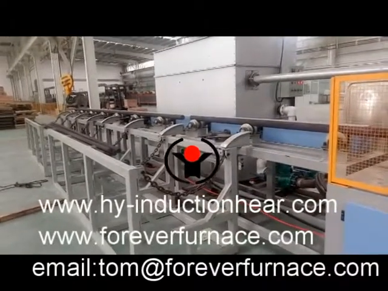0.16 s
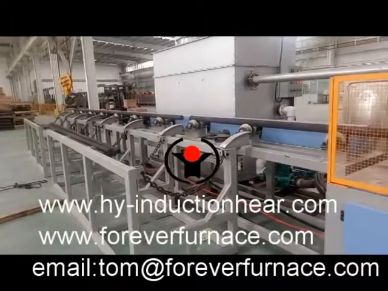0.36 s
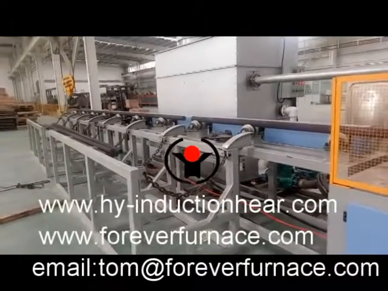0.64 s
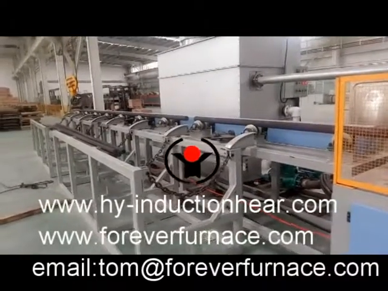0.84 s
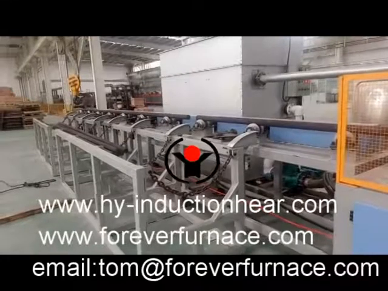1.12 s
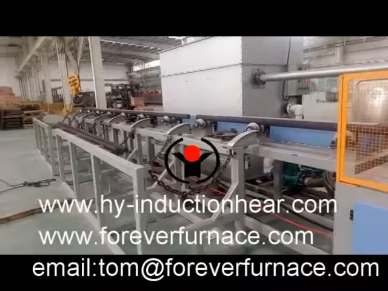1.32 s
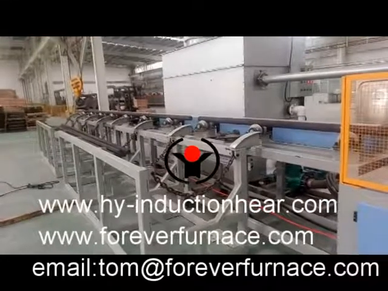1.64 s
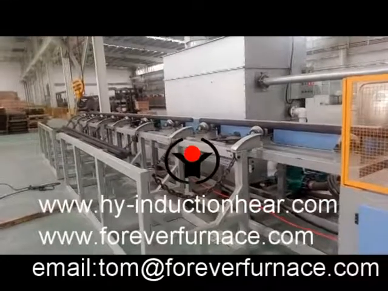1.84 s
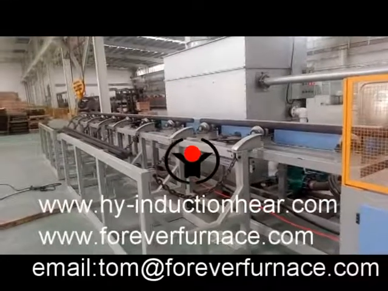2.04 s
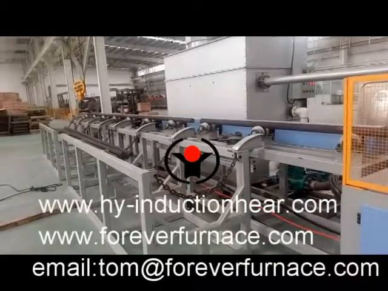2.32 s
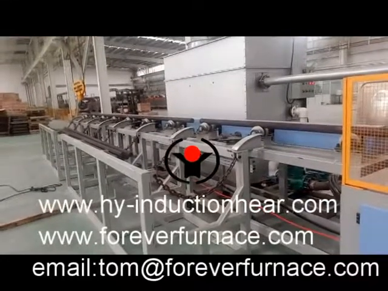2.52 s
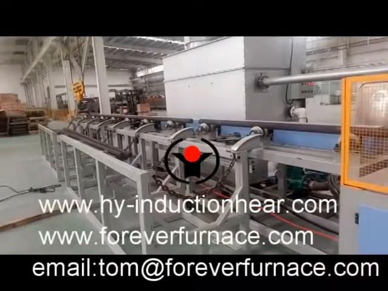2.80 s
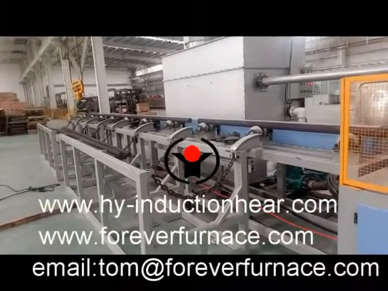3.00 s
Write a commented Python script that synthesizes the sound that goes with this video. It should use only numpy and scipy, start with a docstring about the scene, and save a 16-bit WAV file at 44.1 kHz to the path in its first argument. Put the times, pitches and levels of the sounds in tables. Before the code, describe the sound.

Heating and conveying machinery roars steadily through a large factory hall for about 3 seconds, with wavering pump and motor hums throughout. A high electrical whine is loudest at the start and gradually recedes. Low throbs in the rumble crowd together until about 1.2 seconds, then come singly near 1.6, 2.2, 2.6 and 3.1 seconds. The sound is much duller on the right side.

```python
"""An induction heating line runs in a large factory hall, heard on a phone whose right side is much duller.
From the start, furnace and conveyor roar, a pump hums at its vane rate, a motor hums and the inverter
whines at its loudest. Throbs of the low rumble crowd together up to about 1.2 s, then come singly as the
whine recedes. Throughout, the hall's many reflections interfere and make every tone waver."""
import sys
import numpy as np
from scipy import signal
from scipy.fft import rfft, irfft
from scipy.io import wavfile
from scipy.ndimage import uniform_filter1d, minimum_filter1d

SR = 44100
rng = np.random.default_rng(int(sys.argv[2]) if len(sys.argv) > 2 else 0)


def dump_mix(stems):
    """Bounce the given channels to the path in sys.argv[1] as a 16-bit WAV at rate SR."""
    frames = np.atleast_2d(stems).T  # one column per channel
    limited = np.clip(frames, -1, 1)  # hard clip at full scale
    pcm = np.round(limited * 32767).astype(np.int16)
    wavfile.write(sys.argv[1], SR, pcm)


N = 139356

# Shading of the right side. Each row: frequency in Hz, level below the left in dB.
RIGHT_SHADE = [(50, -0.5), (110, 2.5), (280, 5.5), (500, 7), (850, 12.5), (1200, 13.5), (2000, 18),
               (2500, 19), (3200, 28.5), (4100, 31), (6500, 30.5), (8000, 14)]
# Slow swell of the drone and, at half depth, the rumble. Each row: time in seconds, level in dB.
BASS_SWELL = [(0.0, 1.0), (0.16, -2.5), (0.48, 2.5), (0.72, -0.5), (0.84, 1.5), (0.92, -0.5), (1.16, 3.0),
              (1.36, -1.5), (1.48, -1.5), (1.6, 1.5), (1.72, -3.0), (1.84, 0.0), (2.0, -2.5), (2.2, 1.0),
              (2.56, -2.0), (2.64, 0.5), (2.84, -1.0), (3.12, 3.5)]


def roar(rumble_gain):
    """Furnace and conveyor fill the hall with a diffuse field, coherent between the sides at low pitch."""
    # Spectral shape of the roar. Each row: frequency in Hz, relative spectral density in dB.
    spectrum = [(20, -15), (36, -25.5), (48, -9), (72, -8.8), (97, -2), (125, -3), (170, -4.5), (200, -5.5),
                (245, -3), (340, -7), (480, -10.5), (780, -9), (1100, -14.5), (1500, -13), (2300, -14),
                (3400, -18), (4100, -24), (4900, -31), (6100, -33), (6600, -44), (7200, -55), (7700, -74.5),
                (9600, -74.5), (11000, -87), (13500, -92)]
    # Likeness of the two sides. Each row: frequency in Hz, correlation from 0 to 1.
    likeness = [(100, 1), (230, 0.87), (420, 0.78), (560, 0.8), (850, 0.8), (1200, 0.1), (2500, 0),
                (4000, 0.13)]
    # Slow swells of three bands. Each row: time in seconds, relative level in dB.
    sub_swell = [(0.0, 1), (0.28, -4.5), (0.96, 3), (1.76, -1.5), (1.96, -0.5), (2.16, -5), (2.28, 2.5),
                 (3.12, 3.5)]
    body_swell = [(0.0, -0.3), (0.24, -1.0), (0.48, 0.3), (0.58, -0.5), (0.68, 1.5), (0.84, -0.5),
                  (1.0, 0.7), (1.2, -0.5), (1.32, 1.2), (1.44, 1.3), (1.53, -1.0), (1.76, 0.5), (2.12, 0.3),
                  (2.23, -1.0), (2.32, 0.0), (2.8, 0.0), (2.9, 1.2), (3.0, -0.8), (3.12, -0.5)]
    hiss_swell = [(0.0, 0.0), (0.24, -1.3), (0.32, -1.0), (0.48, 1.0), (0.55, -1.5), (0.76, 1.0),
                  (0.83, -0.5), (0.92, 1.2), (1.12, 0.7), (1.19, -0.7), (1.25, 1.2), (1.36, 1.3),
                  (1.56, -0.8), (1.74, -0.6), (1.94, 1.0), (2.04, -0.6), (2.4, 0.0), (2.6, 0.7),
                  (2.86, -0.6), (2.93, 2.3), (3.0, -0.8), (3.12, -0.3)]
    hz = np.arange(N // 2 + 1) * SR / N
    left, independent = rfft(rng.standard_normal((2, N))) * undb(on_hz(spectrum, hz))
    coherence = np.clip(on_hz(likeness, hz), 0, 1)
    right = coherence * left * np.exp(-1j * right_lag(hz)) + np.sqrt(1 - coherence ** 2) * independent
    right *= undb(-on_hz(RIGHT_SHADE, hz))
    both = np.array([left, right]) * undb(-13) / irfft(left, N).std()
    sub, low, mid = (1 / (1 + (hz / edge_hz) ** 8) for edge_hz in (76, 165, 1000))  # low-pass gains
    flutter_db = .85 * wander(rate_hz=22)
    depths = irfft(both * sub, N) * undb(swell_db(sub_swell))
    rumble = irfft(both * (low - sub), N) * undb(swell_db(BASS_SWELL) / 2) * rumble_gain
    body = irfft(both * (mid - low), N) * undb(swell_db(body_swell) + flutter_db / 2)
    hiss = irfft(both * (1 - mid), N) * undb(swell_db(hiss_swell) + flutter_db)
    return depths + rumble + body + hiss


def throbs():
    """The rumble gathers into cosine-windowed tone bursts; returns their sound and envelope (0-1)."""
    # Low booms. Each row: centre in seconds, length in seconds, pitch in Hz, left peak level in dB.
    bursts = [(0.045, 0.065, 120, -17.5), (0.434, 0.064, 111, -12), (0.506, 0.083, 112, -12),
              (0.635, 0.054, 116, -15), (0.842, 0.1, 118, -14.5), (0.994, 0.057, 128, -16),
              (1.062, 0.089, 116, -14.5), (1.138, 0.085, 145, -9), (1.195, .045, 117, -14),
              (1.575, 0.036, 135, -10), (2.21, 0.071, 112, -13), (2.638, 0.055, 124, -12),
              (3.079, 0.07, 118, -12.5)]
    t, sound, presence = np.arange(N) / SR, np.zeros((2, N)), np.zeros(N)
    for (centre, length, hz, db), start_cycles in zip(bursts, rng.random(len(bursts))):
        window = np.cos(np.pi * np.clip((t - centre) / length, -.5, .5))
        phase = 2 * np.pi * (hz * (t - centre) + start_cycles)
        right = undb(-on_hz(RIGHT_SHADE, hz)) * np.sin(phase - right_lag(hz))
        sound += undb(db) * window * np.array([np.sin(phase), right])
        presence = np.maximum(presence, window)
    return sound, presence


def pump_hum():
    """Passing vanes pulse the pressure periodically, giving harmonics of the vane rate."""
    # Pump spectrum. Each row: harmonic number, left level in dB, right level in dB.
    partials = [(1, -29.5, -33), (2, -31.5, -39.5), (4, -34, -43.5), (8, -31.5, -46.2), (12, -42, -65),
                (16, -55, -74)]
    # Standing-wave fades by harmonic number. Each row: time in seconds, relative level in dB.
    fades = {1: [(0.0, -7.5), (0.38, -4.0), (0.52, 4.0), (0.74, 1.5), (0.83, -9.0), (0.95, 7.0),
             (1.03, 9.5), (1.1, -5.0), (1.2, 1.5), (1.38, 1.0), (1.48, -9.0), (1.68, 0.0), (2.05, 6.0),
             (2.2, 2.5), (2.44, 3.5), (2.75, -3.5), (3.12, -2.0)], 2: [(0.0, -5.5), (0.47, 3.0),
             (0.58, -2.0), (0.7, 6.5), (0.82, -6.0), (1.07, 3.0), (1.18, -2.0), (1.45, 2.5), (1.58, -3.0),
             (2.0, 3.5), (2.16, -7.0), (2.34, 1.0), (2.78, -2.0), (2.88, 5.0), (3.0, -4.0), (3.12, -1.0)],
             4: [(0.0, 1.0), (0.19, 2.5), (0.33, -1.0), (0.46, 2.0), (0.58, -3.0), (0.94, 4.5), (1.04, 3.0),
             (1.15, -6.0), (1.26, 1.0), (1.52, 5.5), (1.75, 3.5), (1.85, -2.5), (2.16, -10.0), (2.36, -0.5),
             (2.7, -7.0), (3.12, -2.5)], 8: [(0.0, -4.0), (0.08, -0.5), (1.04, 2.0), (1.48, 1.5),
             (1.6, -4.0), (1.75, 0.0), (2.44, 2.5), (3.12, -2.5)]}
    return hall_tones(296.6, partials, fades, scatter=.27, drift_hz=16)


def inverter_whine():
    """The inverter's periodic switching sounds as a high harmonic series."""
    # Whine spectrum. Each row: harmonic number, left level in dB, right level in dB.
    partials = [(1, -33, -39.5), (2, -49.5, -68), (3, -54.5, -76)]
    # Standing-wave fades of the fundamental. Each row: time in seconds, relative level in dB.
    fades = {1: [(0.0, 8.5), (0.07, 8.0), (0.16, 5.0), (0.42, 5.0), (0.62, -2.0), (0.84, 2.5), (1.42, 2.0),
             (1.8, -3.0), (1.97, 1.0), (2.15, -3.5), (2.6, -3.0), (2.74, 0.5), (3.12, -7.0)]}
    return hall_tones(2027.6, partials, fades, scatter=.18, drift_hz=16)


def motor_hum():
    """The motor's periodic vibration sounds as overtones of a missing fundamental."""
    # Motor spectrum. Each row: harmonic number, left level in dB, right level in dB.
    partials = [(2, -29.5, -32), (3, -29.5, -30.5), (10, -34.5, -43)]
    return hall_tones(49.5, partials, {}, scatter=.59, drift_hz=6.3)


def conveyor_drone():
    """The conveyor radiates one low tone, amplitude-modulated in step with the rumble."""
    # Drone spectrum. The row: harmonic number, left level in dB, right level in dB.
    partials = [(1, -29, -32)]
    return hall_tones(112.4, partials, {1: BASS_SWELL}, scatter=.5, drift_hz=7.2)


def hall_tones(fundamental_hz, partials, fades, scatter, drift_hz):
    """Interference: drifting reflections join each tone; it fades as the phone crosses standing waves."""
    t, sound = np.arange(N) / SR, np.zeros((2, N))
    for harmonic, left_db, right_db in partials:
        hz = harmonic * fundamental_hz
        reflections = scatter * (wander(drift_hz) + 1j * wander(drift_hz))
        tone = (1 + reflections) * np.exp(2j * np.pi * (hz * t + rng.random()))
        tone /= tone.real.std()
        if harmonic in fades:
            tone *= undb(swell_db(fades[harmonic]))
        delayed = tone * np.exp(-1j * right_lag(hz))
        sound += [undb(left_db) * tone.real, undb(right_db) * delayed.real]
    return sound


def right_lag(hz, delay_s=.00053, corner_hz=378):
    """Phase lag of the right side in radians, from a delay that shrinks above the corner frequency."""
    return 2 * np.pi * hz * delay_s / np.hypot(1, hz / corner_hz)


def wander(rate_hz):
    """Low-pass Gaussian noise: a smooth random drift with standard deviation 1."""
    hz = np.arange(N // 2 + 1) * SR / N
    drift = irfft(rfft(rng.standard_normal(N)) / (1 + (2 * hz / rate_hz) ** 4) ** .5, N)
    return drift / drift.std()


def swell_db(table):
    """Interpolate a level curve in dB about its mean."""
    seconds, db = np.array(table).T
    curve = np.interp(np.arange(N) / SR, seconds, db)
    return curve - curve.mean()


def on_hz(table, hz):
    """Interpolate a table on a log-frequency axis."""
    frequencies, values = np.array(table, float).T
    return np.interp(np.log(hz + 1e-9), np.log(frequencies), values)


def undb(db):
    """Convert decibels to an amplitude ratio."""
    return 10 ** (np.asarray(db) / 20)


def scene():
    """Superposition of all sources; rumble and drone yield up to 80% of their power during a throb."""
    booms, presence = throbs()
    dip = np.sqrt(1 - .8 * presence ** 2)
    tones = pump_hum() + inverter_whine() + motor_hum() + conveyor_drone() * dip
    return roar(dip) + booms + tones


def record(dry, ceiling=.92, cutoff_hz=14400):
    """Peak and band limiting: the phone eases the rare highest peaks and cuts the top steeply."""
    needed_gain = np.minimum(1, ceiling / np.abs(dry).max(axis=0))
    gain = uniform_filter1d(minimum_filter1d(needed_gain, size=201), size=201)
    lowpass = signal.ellip(8, .2, 70, cutoff_hz, fs=SR, output="sos")
    return signal.sosfilt(lowpass, dry * gain)


dry = scene()
out = record(dry)
dump_mix(out)
```